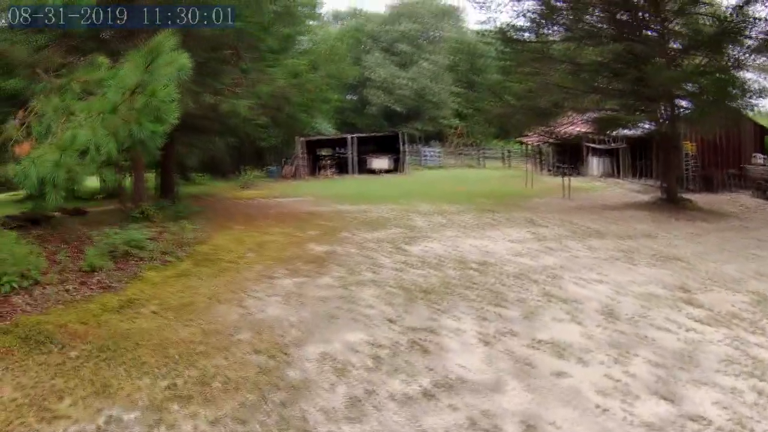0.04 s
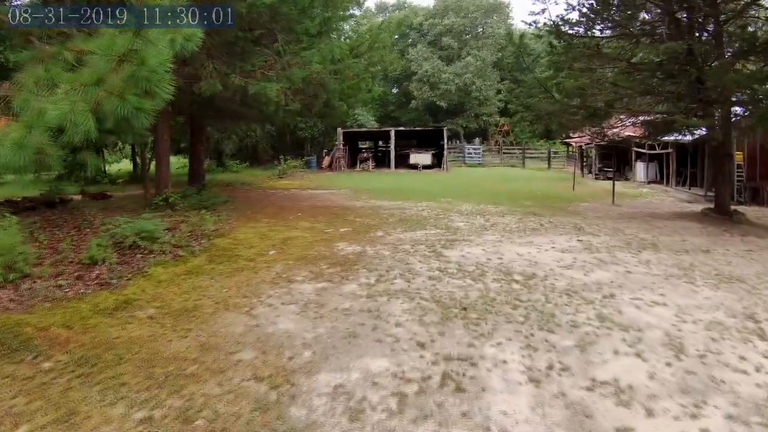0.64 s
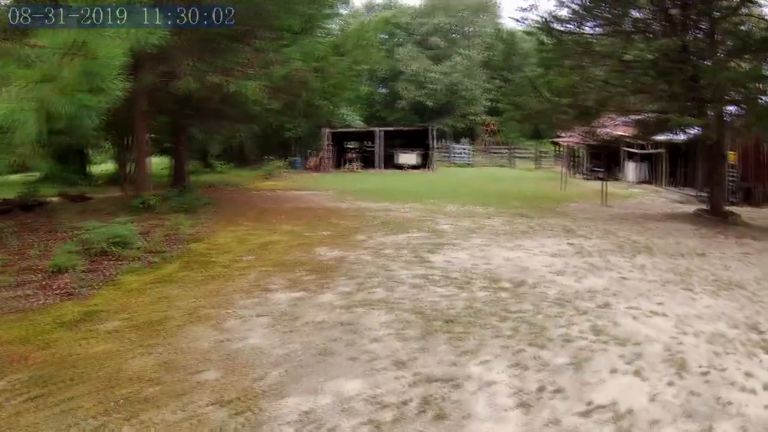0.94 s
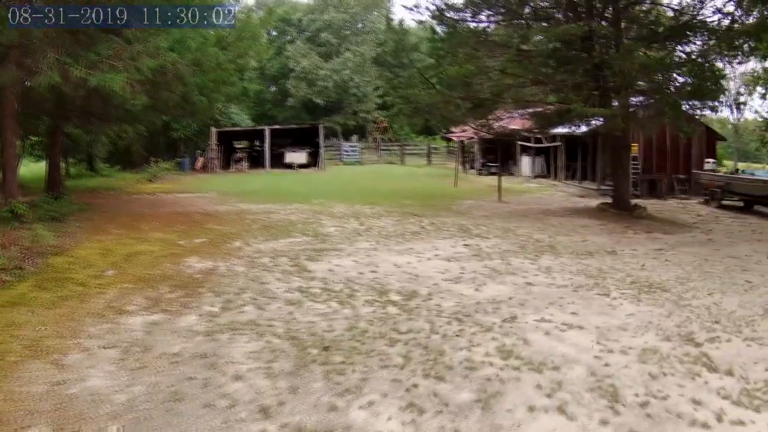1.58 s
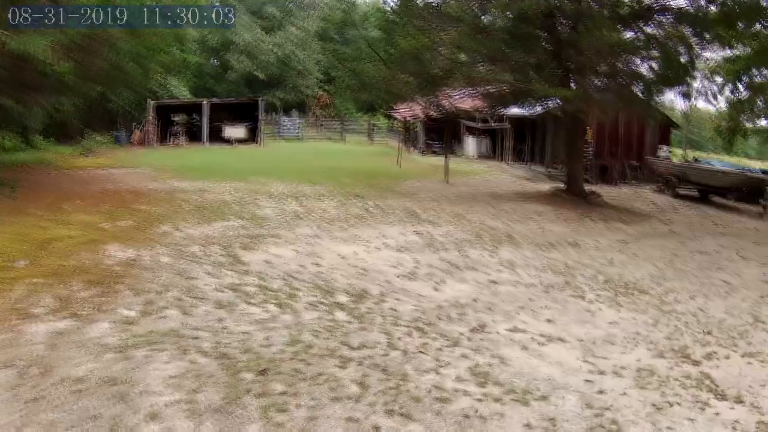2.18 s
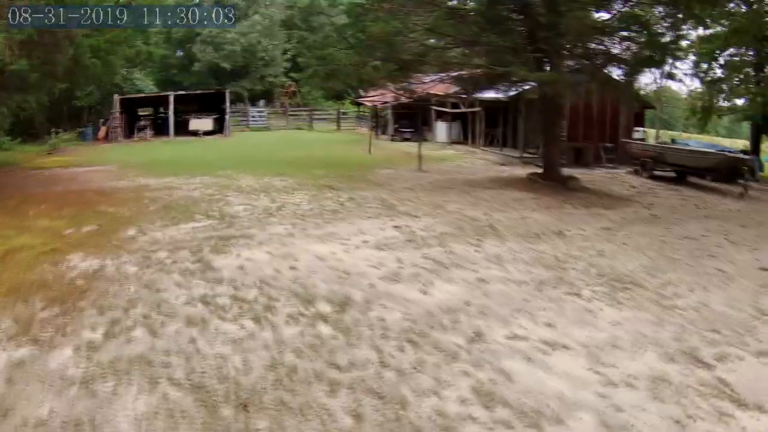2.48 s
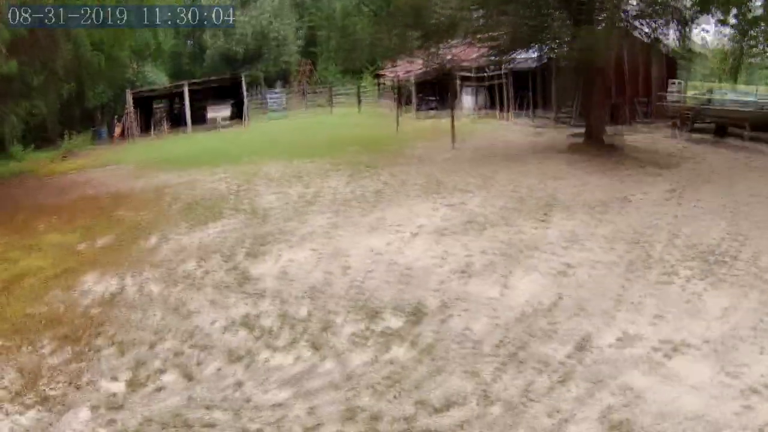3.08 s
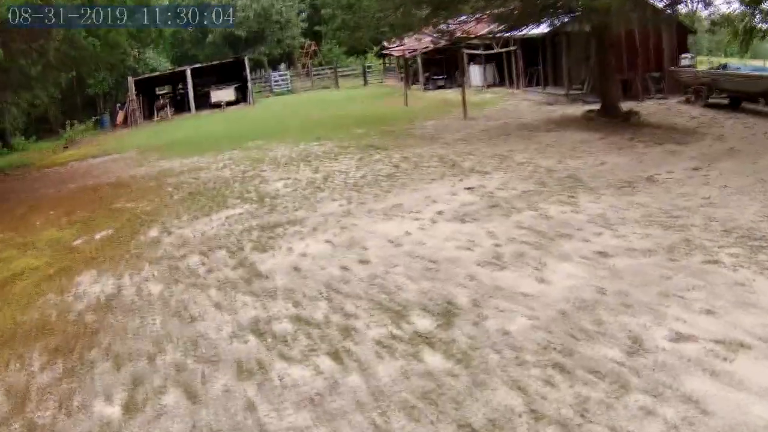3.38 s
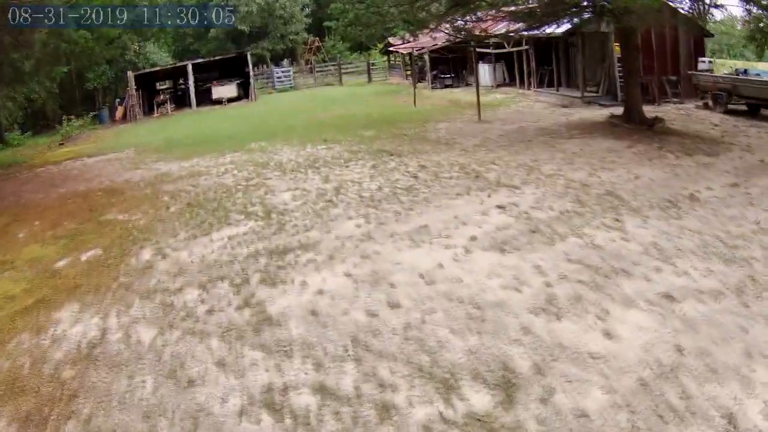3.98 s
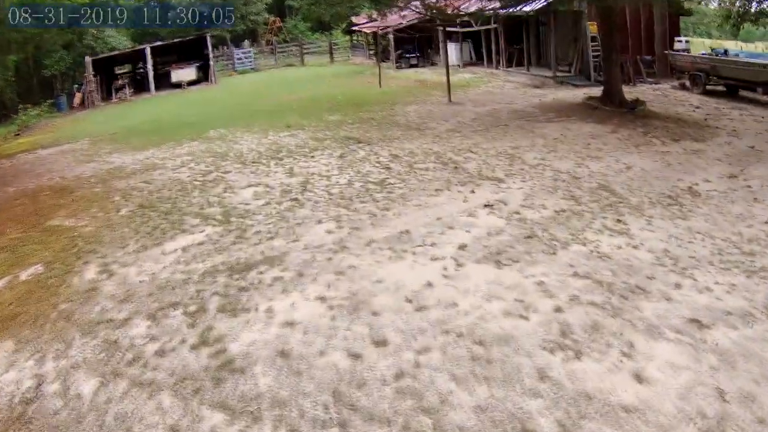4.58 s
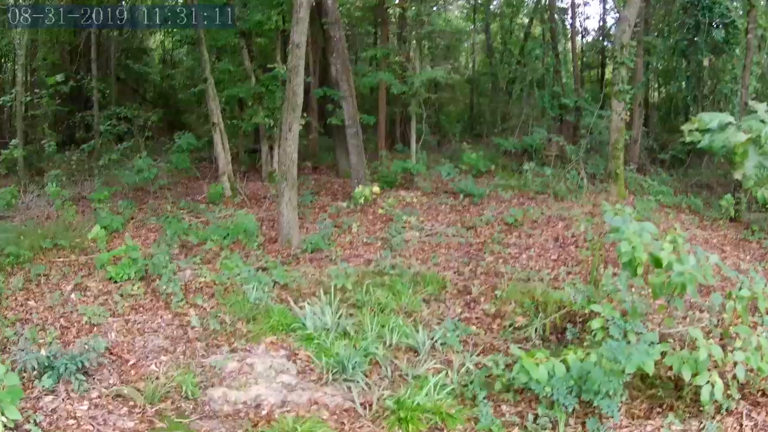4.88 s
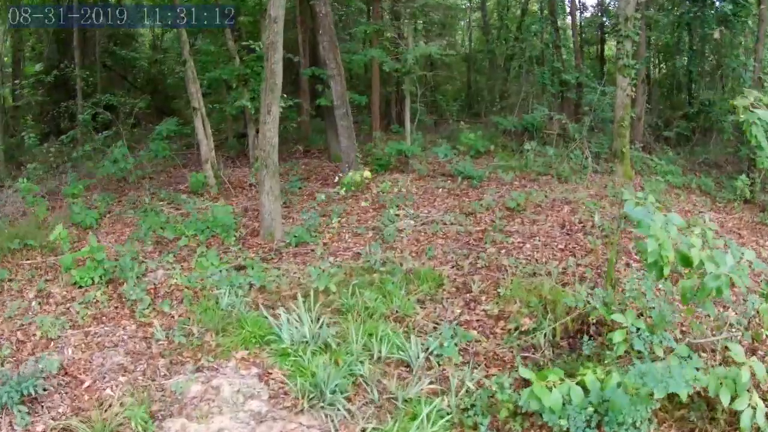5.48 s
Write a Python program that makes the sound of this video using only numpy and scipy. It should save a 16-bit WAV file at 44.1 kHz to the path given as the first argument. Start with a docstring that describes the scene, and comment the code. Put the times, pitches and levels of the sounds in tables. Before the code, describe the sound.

The setting is a quiet outdoor yard with a faint rush of air. Right at the start a distant animal gives one short, faint rising call with a slight echo. Soft scuffs of soles and small ticks follow until about 2.3 seconds. At 2.5 seconds carried gear clacks loudly right at the microphone, followed by lighter ticks, rubs and dull thuds. From 3.8 to 4.4 seconds comes a busier cluster of sharp clicks, rasps and low bumps. A loud, bright snap lands at 4.5 seconds and a hard knock at 4.8. The sound then drops out for an instant and resumes in a quiet wood with faint, distant insects. From 5 seconds, steps softly crunch leaves and crack small twigs, the strongest crack coming at about 5.6 seconds.

```python
"""Carried gear clacks, snaps and knocks right at the microphone as someone crosses a quiet sandy yard. Its
struck parts ring, loose ones tick and rub on the case, and jolts reach the microphone as dull thuds. Farther
off an animal gives one short rising call at the start, which echoes; soles scuff the ground. Near the end the
scene changes: after a brief silence comes a wood, with far insects and steps on leaves and twigs."""
import sys
import numpy as np
from scipy import signal
from scipy.fft import rfft, irfft, next_fast_len
from scipy.io import wavfile
from scipy.ndimage import uniform_filter1d, minimum_filter1d

SR = 44100
rng = np.random.default_rng(int(sys.argv[2]) if len(sys.argv) > 2 else 0)


def transcribe(signal):
    """Save signal, clipped to [-1, 1], as a 16-bit WAV file at the path in sys.argv[1]."""
    frames = np.atleast_2d(signal).T
    limited = np.clip(frames, -1, 1)
    pcm = np.round(limited * 32767).astype(np.int16)
    wavfile.write(sys.argv[1], SR, pcm)


N = 248496
TIME = np.arange(N) / SR


def from_db(db):
    """Decibels to gain."""
    return 10 ** (np.asarray(db) / 20)


def rms_one(x):
    """Scale to unit rms."""
    return x / np.sqrt(np.mean(x ** 2) + 1e-20)


def decay(t, t60):
    """Exponential fall of 60 dB in t60 seconds."""
    return np.exp(-np.log(1000) * t / t60)


def butter(x, hz, kind="low", order=2):
    """Causal Butterworth filter."""
    sections = signal.butter(order, np.clip(hz, 10, .45 * SR), kind, fs=SR, output="sos")
    return signal.sosfilt(sections, x + 1e-18)


def add(out, start_s, sound):
    """Mix a sound in at its start time."""
    start = max(round(start_s * SR), 0)
    part = out[start:start + len(sound)]
    part += sound[:len(part)]


def coloured(x, spectrum):
    """Give a steady sound a smooth spectrum, at unit rms."""
    hz, db = np.transpose(spectrum)
    size = next_fast_len(N, True)
    bins = np.maximum(np.fft.rfftfreq(size, 1 / SR), 1)
    gains = from_db(np.interp(np.log(bins), np.log(hz), db))
    return rms_one(irfft(rfft(x, size) * gains, size)[:N])


def ring(modes):
    """A struck body rings as damped sines, neighbouring modes swinging in opposite directions."""
    t = TIME[:round(2 * SR * max(t60 for _, _, t60 in modes))]
    return sum((-1) ** k * from_db(db) * np.sin(2 * np.pi * hz * t) * decay(t, t60)
               for k, (hz, db, t60) in enumerate(modes))


def taps(events, modes, spread_db, low_hz, detune_octaves=.06):
    """Small contacts: the spot that is hit shifts each mode's pitch and share of the force."""
    out = np.zeros(N)
    for start, db, bright_hz in events:
        draws = rng.standard_normal((len(modes), 2))
        tap = ring([(hz * 2 ** (detune_octaves * shift), level + spread_db * share, t60)
                    for (hz, level, t60), (share, shift) in zip(modes, draws)])
        tap = butter(tap, bright_hz, order=3)   # a soft contact loses the treble
        tap = butter(tap, low_hz, "high", order=3)   # a small body loses the bass
        add(out, start, from_db(db) * tap / np.abs(tap).max())
    return out


def stroke(start, length, peak_share, swell_db=9, edge_share=.065):
    """A slide makes contact, speeds up, slows and lets go: the samples it covers and its gain there."""
    span = slice(*np.searchsorted(TIME, [start - length / 2, start + length + length / 2]))
    progress = (TIME[span] - start) / length
    contact = .5 + .5 * np.tanh(np.minimum(progress, 1 - progress) / edge_share)
    slowness = np.interp(progress, [0, peak_share, 1], [1, 0, 1])
    return span, contact * from_db(-swell_db * slowness)


def friction(strokes, colour, slips_per_s, size_db):
    """Dense tiny slips of uneven size, heard while each stroke lasts."""
    slips = (rng.random(N) < slips_per_s / SR) * rng.choice([-1, 1], N)
    sizes = from_db(size_db * np.minimum(rng.exponential(1, N), 4))
    grain = coloured(slips * sizes, colour)
    out = np.zeros(N)
    for start, length, db, peak_share, low_hz, high_hz in strokes:
        span, gain = stroke(start, length, peak_share)
        rasp = butter(grain[span], low_hz, "high", order=3)
        rasp = butter(rasp, high_hz, order=5)
        out[span] += from_db(db) * gain * rms_one(rasp)
    return out


# Still air all round the microphone in each place: (frequency [Hz], relative level [dB])
YARD_AIR = [(20, -18.5), (45, -12.5), (80, -5), (140, 0), (230, -5.5), (400, -8.5), (750, -15),
            (1200, -16.5), (1700, -22.5), (3000, -27), (6000, -29), (16000, -32)]
WOOD_AIR = [(15, -36), (25, -8.5), (161, 1.5), (394, -2.5), (911, -7.5), (1040, -6), (1560, -15),
            (5280, -22), (6920, -22.5), (8360, -23.5), (16000, -26)]
# Insects far off in each place: (frequency [Hz], bandwidth [Hz], rms level [dB])
YARD_INSECTS = [(5500, 70, -94.5), (11050, 400, -95)]
WOOD_INSECTS = [(6850, 340, -82.5), (7370, 420, -85)]


def ambience(spectrum, insects, air_db):
    """The bed of a place: a faint rush of air and the narrow buzz of distant insects."""
    out = from_db(air_db) * coloured(rng.standard_normal(N), spectrum)
    for hz, width, db in insects:
        buzz = butter(rng.standard_normal(N), [hz - width / 2, hz + width / 2], "band")
        out += from_db(db) * rms_one(buzz)
    return out


def yard_echo(x, wet_db, t60, band_hz, rise_s=.018):
    """Trunks and sheds across the yard scatter a dull, thin tail back to the microphone."""
    t = TIME[:SR]
    scatter = butter(rng.standard_normal(SR), band_hz, "band", order=3)
    tail = scatter * decay(t, t60) * np.minimum(t / rise_s, 1)
    return from_db(wet_db) * signal.fftconvolve(x, tail / np.sqrt(np.sum(tail ** 2)))[:N]


# Throat resonances of the distant animal: (frequency [Hz], bandwidth [Hz], level [dB])
THROAT_RESONANCES = [(475, 130, -44.5), (1070, 230, -44), (1490, 140, -57), (2400, 600, -68)]


def animal_call(start_hz=450, rise_hz_per_s=1850, hold_s=.058, release_s=.025):
    """One far call; five rising harmonics light up as they glide through the throat's resonances."""
    t = TIME[TIME < hold_s + release_s]
    harmonic_hz = np.outer(np.arange(1, 6), start_hz + rise_hz_per_s * t)
    phases = 2 * np.pi * np.cumsum(harmonic_hz, axis=1) / SR
    gains = sum(from_db(db) / (1 + (2 * (harmonic_hz - hz) / width) ** 2) ** 2
                for hz, width, db in THROAT_RESONANCES)
    effort = np.interp(t, [hold_s, hold_s + release_s], [1, 0])
    out = np.zeros(N)
    add(out, 0, effort * np.sum(gains * np.sin(phases), axis=0))
    return out


# Dull wash of the animal call's echo across the yard (first row), then soles scuffing the ground:
# (time [s], length [s], level [dB], treble cutoff [Hz])
WASH_AND_SCUFFS = [(.06, .1, -61, 1100), (.88, .12, -66, 2500), (1.155, .15, -59.5, 1100),
                   (1.78, .17, -68.5, 3200), (5.037, .025, -60, 5000), (5.16, .16, -65, 700),
                   (5.32, .1, -58.5, 1700), (5.53, .19, -50.5, 1350)]
# Grainy noise of the wash and the scuffs: (frequency [Hz], relative level [dB])
GRAIN_COLOUR = [(120, -6), (250, 4.5), (420, 6), (900, -4), (1400, -2.5), (2200, -9.5), (4000, -22.5),
                (9000, -12), (15000, -28)]
# Twigs and grit cracking underfoot: (time [s], peak level [dB], treble cutoff [Hz])
TWIG_CRACKS = [(1.206, -51, 600), (1.835, -54, 2500), (5.04, -46.5, 3000), (5.2435, -41.5, 4540),
               (5.3203, -45, 796), (5.3523, -36.5, 2450), (5.3732, -38, 1410), (5.531, -45, 900),
               (5.5705, -36, 1500), (5.598, -40.5, 1000), (5.6255, -25, 1100)]
# Ring of a twig: (frequency [Hz], relative level [dB], t60 [s])
TWIG_MODES = [(383, -6, 0.019), (605, -3.5, 0.017), (952, -2.5, 0.016), (1420, -8.5, .008),
              (2220, -6, 0.0039), (4100, -7.5, 0.0097)]


def call_wash_and_steps(peak_share=.35, low_hz=230):
    """A dull wash echoes the call; later soles crunch as the weight lands, and some crack a twig."""
    strokes = [(start, length, db, peak_share, low_hz, high_hz)
               for start, length, db, high_hz in WASH_AND_SCUFFS]
    swells = friction(strokes, GRAIN_COLOUR, slips_per_s=700, size_db=3.5)
    return swells + taps(TWIG_CRACKS, TWIG_MODES, spread_db=2.5, low_hz=170)


# A strap or part sliding on the case, close to the microphone: (time [s], length [s], rasp level [dB],
# fastest point [share of length], bass cutoff [Hz], treble cutoff [Hz], shudder level [dB])
RUBS = [(2.436, .016, -41, .4, 950, 1800, -50), (2.54, .095, -59, .2, 750, 2500, -59),
        (2.67, .1, -67, .7, 1500, 2600, -52), (2.784, .036, -42.5, .05, 1100, 2280, -53),
        (2.82, .05, -58, .2, 800, 2400, -52), (2.892, .1, -56, .15, 420, 1150, -45),
        (3.15, .17, -69, .4, 500, 3000, -55), (3.47, .06, -67, .3, 400, 2500, -54),
        (3.783, .035, -49.5, .3, 700, 10500, -52), (3.82, .075, -61.5, .1, 700, 5000, -45),
        (3.902, .073, -37.5, .42, 680, 11000, -45), (3.98, .17, -59, .3, 620, 4500, -58),
        (4.22, .16, -55, .88, 1170, 2200, -73), (4.337, .04, -58, .7, 1700, 8000, -41.5),
        (4.388, .034, -55.5, .45, 1100, 8800, -50)]
# Rasp of the case's surface: (frequency [Hz], relative level [dB])
RUB_COLOUR = [(300, -15), (500, -11), (740, 4.5), (1200, 0), (1700, -8), (2200, -7.5), (2900, -15),
              (3800, -16.5), (5500, -15.5), (8000, -20.5), (11000, -21), (15000, -21)]


def gear_rubs(shudder_low_hz=125, shudder_high_hz=165):
    """Sliding parts rasp on the case, and their drag makes the housing shudder in the bass."""
    out = friction([row[:-1] for row in RUBS], RUB_COLOUR, slips_per_s=3500, size_db=3.0)
    shudder = butter(rng.standard_normal(N), shudder_low_hz, "high")
    shudder = butter(shudder, shudder_high_hz, order=8)
    for start, length, _, peak_share, _, _, db in RUBS:
        span, gain = stroke(start, length, peak_share)
        out[span] += from_db(db) * gain * rms_one(shudder[span])
    return out


# Loose gear bumping the case at the microphone, a tick and a thud each time:
# (time [s], tick level [dB], tick treble cutoff [Hz], thud level [dB], thud pitch [Hz])
BUMPS = [(.197, -57, 900, -54, 112), (.968, -53.5, 600, -68, 130), (1.153, -60, 700, -55, 120),
         (1.488, -57.5, 3000, -70, 130), (2.328, -58, 890, -68, 130), (2.441, -38.5, 1300, -36, 142),
         (2.785, -39.5, 1900, -58, 140), (2.827, -46, 1800, -40, 106), (2.893, -41, 690, -41, 135),
         (3.1595, -52, 2160, -52, 138), (3.206, -53, 2380, -62, 135), (3.456, -55, 590, -46.5, 125),
         (3.7738, -16, 8900, -21.5, 133), (3.859, -40, 1400, -54, 135), (3.8918, -28, 4000, -36, 140),
         (4.0104, -36, 1950, -48, 142), (4.029, -50, 2000, -34, 168), (4.0707, -21, 3500, -36.5, 165),
         (4.092, -36, 1400, -46, 170), (4.5265, -37, 3200, -41, 150)]
# Ring of the case: (frequency [Hz], relative level [dB], t60 [s])
CASE_MODES = [(690, -6, .024), (1100, -6, 0.017), (1750, -2, 0.013), (2380, -6, .01), (3750, -1, .008),
              (5300, -7, .004), (7600, -11, .003), (14020, -24, .002)]


def case_ticks():
    """Each bump briefly rings the case's high modes."""
    return taps([row[:3] for row in BUMPS], CASE_MODES, spread_db=2.0, low_hz=560)


# Low ring of the housing: (frequency [multiple of thud pitch], relative level [dB], t60 [s])
HOUSING_MODES = [(1, 3.5, 0.13), (1.35, -6, .14), (.62, -9.5, .06)]


def housing_thuds(rise_s=.0045, rumble_db=-18, rumble_t60=.26, rumble_band_hz=(50, 191)):
    """Handling noise: each bump sets the housing swinging, with a dull rumble of shifting parts."""
    thuds, rumble_gain = np.zeros(N), np.zeros(N)
    for start, _, _, db, hz in BUMPS:
        swing = ring([(hz * multiple, level, t60) for multiple, level, t60 in HOUSING_MODES])
        t = TIME[:len(swing)]
        swell = 1 - np.exp(-(t / rise_s) ** 2)
        thud = swell * swing
        add(thuds, start, from_db(db) * thud / np.abs(thud).max())
        add(rumble_gain, start, from_db(db + rumble_db) * swell * decay(t, rumble_t60))
    rumble = rms_one(butter(rng.standard_normal(N), rumble_band_hz, "band", order=4))
    return thuds + rumble_gain * rumble


# Ring of three parts of the gear, right at the microphone: (frequency [Hz], relative level [dB], t60 [s])
CLACK_MODES = [(107, -27, .13), (189, -22, .125), (425, -12.5, .011), (598, -24, .11), (862, -11.5, .074),
               (928, -14.5, .04), (1127, -6.5, .034), (1344, -1.5, 0.019), (1747, -6.5, .024),
               (1940, -7.5, .025), (2226, -6, .022), (2570, -30, .035), (2918, -26.5, .022),
               (4480, -26, .009)]
SNAP_MODES = [(133, -30.5, 0.0448), (362, -24.5, 0.0166), (780, -14.5, 0.023), (1460, -15, 0.0107),
              (2200, -11.5, 0.0083), (3813, -9.5, 0.0042), (4649, -8.5, 0.0048), (6395, 0.5, 0.0024),
              (7998, -28.5, 0.0073), (9700, -31, 0.003), (15417, -23, 0.0028)]
KNOCK_MODES = [(136, -18, 0.079), (336, -3.5, 0.0076), (560, -21.5, 0.016), (903, -9.5, 0.0215),
               (1071.5, 4, 0.006), (1501, -2, 0.0085), (2435, -16.5, 0.0088), (3854, -21, 0.0077),
               (5640, -15, 0.0028), (8650, -22, 0.004)]


def gear_blow(modes, start_s, gain_db, bright_hz, chatter_db):
    """A hard blow rings one part; while the swing is wide, loose joints chatter in a bright crack."""
    swing = ring(modes)
    swing_power = uniform_filter1d(swing ** 2, size=32) / np.mean(swing[:128] ** 2)
    chatter = rms_one(butter(rng.standard_normal(len(swing)), [2800, 7500], "band")) * swing_power
    blow = butter(swing + from_db(chatter_db) * chatter, bright_hz, order=4)
    out = np.zeros(N)
    add(out, start_s, from_db(gain_db) * blow)
    return out


def scene(yard_end_s=4.828, wood_start_s=4.860):
    """One microphone: gear against it, feet below it, the yard and then the wood around it."""
    clack = gear_blow(CLACK_MODES, start_s=2.4552, gain_db=.5, bright_hz=7800, chatter_db=-34)
    snap = gear_blow(SNAP_MODES, start_s=4.488, gain_db=0, bright_hz=18000, chatter_db=-30)
    rebound = gear_blow(SNAP_MODES, start_s=4.505, gain_db=-41, bright_hz=18000, chatter_db=-25)
    knock = gear_blow(KNOCK_MODES, start_s=4.761, gain_db=0, bright_hz=9800, chatter_db=-36)
    gear = clack + snap + rebound + knock + case_ticks() + housing_thuds() + gear_rubs()
    wash_and_steps = call_wash_and_steps()
    animal = animal_call()
    # only the clack and the call carry across the yard; the other gear sounds arrive through the case
    echoes = yard_echo(clack, wet_db=-46, t60=.26, band_hz=(700, 2700))
    echoes += yard_echo(animal, wet_db=-21, t60=.22, band_hz=(350, 2630))
    yard = gear + animal + echoes + wash_and_steps + ambience(YARD_AIR, YARD_INSECTS, air_db=-67.4)
    wood = wash_and_steps + ambience(WOOD_AIR, WOOD_INSECTS, air_db=-67.5)
    return (yard * (TIME < yard_end_s) + wood * (TIME > wood_start_s))[None]


def record(dry, low_hz=25, top_hz=17300):
    """The microphone loses the deepest bass; a fast limiter holds the hardest blows; the top is cut."""
    heard = butter(dry, low_hz, "high", order=1)
    limiter_gain = minimum_filter1d(1 / np.maximum(np.abs(heard), 1), size=15)
    limited = heard * uniform_filter1d(limiter_gain, size=15)
    return signal.sosfilt(signal.cheby2(16, 70, top_hz, fs=SR, output="sos"), limited)


dry = scene()
out = record(dry)
transcribe(out)
```